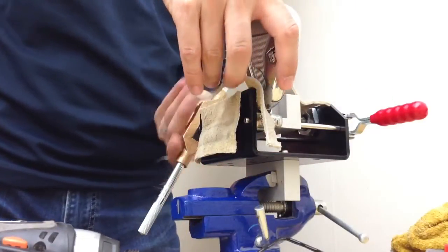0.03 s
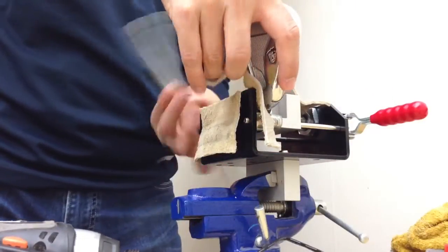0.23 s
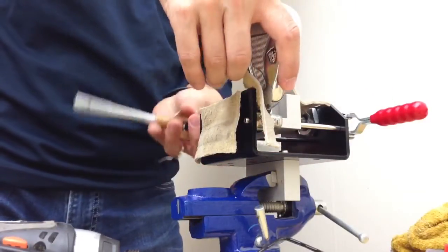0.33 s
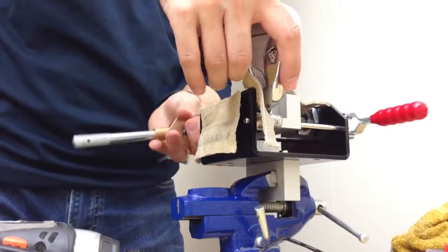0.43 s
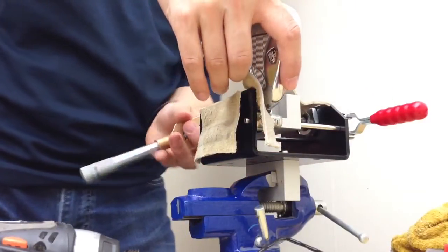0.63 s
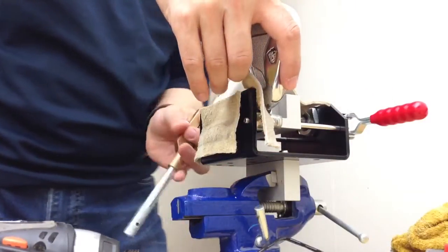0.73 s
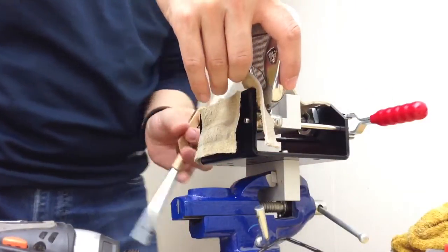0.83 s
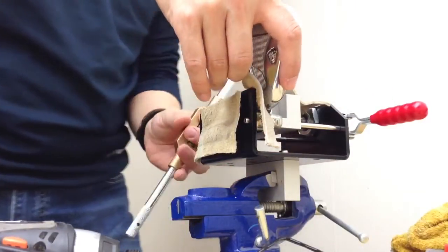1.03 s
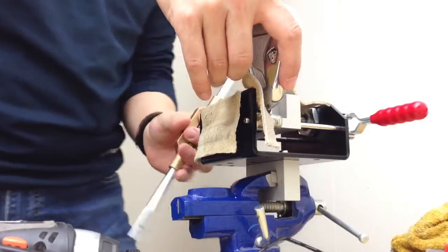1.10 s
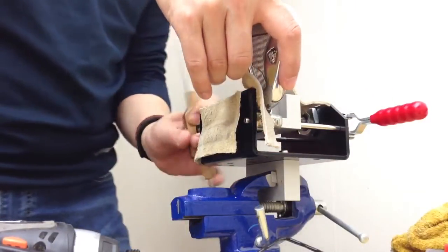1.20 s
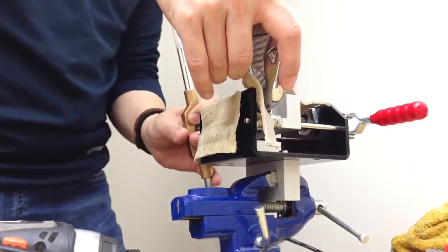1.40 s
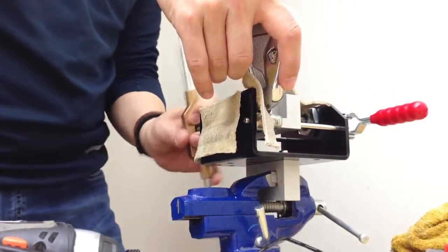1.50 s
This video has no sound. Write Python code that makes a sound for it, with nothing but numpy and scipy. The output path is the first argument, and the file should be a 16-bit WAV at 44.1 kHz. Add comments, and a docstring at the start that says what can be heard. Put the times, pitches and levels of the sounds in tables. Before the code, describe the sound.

A hand reamer scrapes inside a vise-held metal part in short, gritty, faintly groaning strokes. The first, at 0.2 seconds, carries piercing, very high squeaks, followed by ringing knocks of the loose handle until 0.4. A second stroke at 0.7 squeaks briefly and cracks; light knocks follow. A third at 1.2 crackles with breaking chips. A harsher rasp starts around 1.5, in a small, quiet workshop.

```python
"""Small workshop: a hand reamer is turned in short strokes in a metal part held in a vise.
The flutes scrape and shed chips, which shake the clamp; the dragging tool groans and whistles.
Now and then an edge sticks and squeals very high. The loose sliding handle knocks in its
holder and rings. A harsher rasp starts at the end."""
import sys
import numpy as np
from scipy import signal
from scipy.fft import rfft, irfft
from scipy.io import wavfile
from scipy.ndimage import uniform_filter1d

SR = 44100
rng = np.random.default_rng(int(sys.argv[2]) if len(sys.argv) > 2 else 0)


def persist_wave(psi):
    """Save psi, clipped to +-1, as 16-bit WAV."""
    counts = np.round(np.clip(psi, -1, 1) * 32767).astype(np.int16)
    wavfile.write(sys.argv[1], SR, np.atleast_2d(counts).T)


N = 68355
T = np.arange(N) / SR
DULL_CONTACT_HZ, SHARP_CONTACT_HZ = 1540, 3920


def from_db(db):
    """Decibels to gain."""
    return 10 ** (np.asarray(db) / 20)


def unit_rms(x):
    """Scale to unit power."""
    return x / np.sqrt(np.mean(x ** 2) + 1e-20)


def lowpass(x, hz):
    """Two-pole low-pass."""
    return signal.sosfilt(signal.butter(2, hz, fs=SR, output="sos"), x)


def drift(rate_hz):
    """Smooth random wobble, unit power."""
    return unit_rms(lowpass(rng.standard_normal(N), rate_hz))


def colour(x, spectrum):
    """Apply a (frequency [Hz], gain [dB]) curve; unit power."""
    hz, db = np.transpose(spectrum)
    bins_hz = np.maximum(np.fft.rfftfreq(2 * N, 1 / SR), 1)
    gain = from_db(np.interp(np.log(bins_hz), np.log(hz), db))
    return unit_rms(irfft(rfft(x, 2 * N) * gain)[:N])


def grains(per_s, spread_db):
    """Random clicks of uneven size."""
    sizes = from_db(spread_db * np.minimum(rng.exponential(1, N), 4))
    return sizes * rng.choice([-1, 1], N) * (rng.random(N) < per_s / SR)


def blows(times_s, levels_db, contact_hz):
    """One low-passed click per contact."""
    clicks = np.zeros(N)
    np.add.at(clicks, (times_s * SR).astype(int), from_db(levels_db))
    return lowpass(clicks + 1e-18, contact_hz)


def resonate(drive, modes):
    """Decaying modes in parallel, alternating in sign."""
    out = np.zeros(N)
    for k, (hz, db, t60_s) in enumerate(modes):
        radius = from_db(-60 / (t60_s * SR))
        feedback = [1, -2 * radius * np.cos(2 * np.pi * hz / SR), radius ** 2]
        out += (-1) ** k * from_db(db) * signal.lfilter([.5, 0, -.5], feedback, drive + 1e-18)
    return out


def envelope(time_s, hold_s, rise_s, decay_s):
    """Smooth rise ending at time_s, hold, exponential fall."""
    rise = np.clip((T - time_s) / rise_s + 1, 0, 1)
    fall = np.exp(-np.maximum(T - time_s - hold_s, 0) / decay_s)
    return np.sin(rise * np.pi / 2) ** 2 * fall


def bursts(times_s, levels_db, spectrum, decay_s, rise_s=0.0011):
    """Short bursts of coloured noise."""
    level = sum(from_db(db) * envelope(time_s + rise_s / 2, 0, rise_s, decay_s)
                for time_s, db in zip(times_s, levels_db))
    return level * colour(rng.standard_normal(N), spectrum)


# cutting-edge load: (time [s], level [dB])
EDGE_LOAD = [(0, -96), (.18, -70), (.225, -53.5), (.285, -45.5), (.33, -55.5), (.45, -65), (.52, -67),
             (.58, -75), (.63, -104), (.685, -82), (.735, -49), (.80, -55), (.86, -71), (.91, -58),
             (.95, -79), (.985, -80), (1.15, -86), (1.195, -49.5), (1.25, -46.5), (1.29, -44.5),
             (1.345, -47), (1.375, -56.5), (1.46, -74.5), (1.55, -77)]
# vise and part modes: (frequency [Hz], gain [dB], t60 [s])
VISE_MODES = [(75, -20.5, 0.1), (165.5, -6, 0.11), (248.6, -4, 0.11), (294.7, -5, 0.12), (337.3, -5, 0.16),
              (401, -4.5, 0.063), (468, -1.5, 0.087), (545, -3, 0.045)]
PART_MODES = [(624, -7, 0.042), (824, -5.5, 0.045), (941, -1.5, 0.046), (1049, -4, 0.017),
              (1388, -10.5, 0.053), (1630, -12.5, 0.033)]


def chatter():
    """Uneven slips of the loaded edges shake vise and part."""
    slips = lowpass(grains(per_s=600, spread_db=4), DULL_CONTACT_HZ)
    shake = resonate(slips, VISE_MODES) + from_db(-0.5) * resonate(slips, PART_MODES)
    shake /= np.sqrt(uniform_filter1d(shake ** 2, size=2205) + 1e-9)  # unit power over 50 ms
    load_db = np.interp(T, *np.transpose(EDGE_LOAD))
    return from_db(load_db) * shake


# reamer strokes: (time [s], hold [s], level [dB])
STROKES = [(0.227, 0.088, -52.5), (0.548, 0.033, -67.5), (0.719, 0.035, -54), (0.888, 0.013, -63),
           (1.199, 0.058, -52.5), (1.244, 0.13, -70)]
# flute friction: (frequency [Hz], gain [dB])
SCRAPE_SPECTRUM = [(60, -27), (300, -4), (700, 5.5), (1200, 6.5), (1750, -7), (2200, 3.5), (3600, -8.5),
                   (5500, -13.5), (6700, -7.5), (8200, -11), (12000, -12), (16000, -16.5)]


def scrape():
    """Flutes slide over the metal with a grainy, catching rasp."""
    level = sum(from_db(db) * envelope(time_s, hold_s, rise_s=0.038, decay_s=0.033)
                for time_s, hold_s, db in STROKES)
    catches = from_db(2 * drift(rate_hz=69.4))
    return level * catches * colour(grains(per_s=3500, spread_db=3.5), SCRAPE_SPECTRUM)


# harsh rasp: (frequency [Hz], gain [dB])
BITE_SPECTRUM = [(150, -23), (500, 4), (800, -1), (1600, -9.5), (2000, -0.5), (2300, 7), (3200, -7),
                 (4300, 1), (5200, -2.5), (6200, -8), (10000, -11.5), (15000, -31)]


def bite():
    """The edges dig in with a brighter, harsher rasp."""
    level = from_db(-40.5) * envelope(time_s=1.543, hold_s=1, rise_s=0.0078, decay_s=1)
    return level * colour(grains(per_s=3500, spread_db=3.5), BITE_SPECTRUM)


# chip breaks: (time [s], thud [dB], clink [dB], crack [dB])
CHIPS = [(.7412, -45, -46.5, -49.5), (.776, -44, -63, -36.5), (1.2476, -45, -40.5, -49),
         (1.2540, -49, -34.5, -57), (1.2795, -32.5, -39, -44), (1.2860, -38, -39.5, -56),
         (1.318, -41.5, -40, -48.5)]
# fracture noise: (frequency [Hz], gain [dB])
CRACK_SPECTRUM = [(300, -17), (1400, 5), (1800, -0.5), (2250, 3.5), (2850, -4), (3400, -12), (4300, -7.5),
                  (6000, -14.5), (15000, -31)]
# modes of the chip and of the part in padded jaws: (frequency [Hz], gain [dB], t60 [s])
SNAP_MODES = [(2075, -3.5, 0.029), (2277, -3, 0.027), (2810, -7.5, 0.042)]
THUD_MODES = [(402, 2, 0.018)]


def chips():
    """Each chip cracks off, rings the part and jolts the vise."""
    times_s, thud_db, clink_db, crack_db = np.transpose(CHIPS)
    crack = bursts(times_s, crack_db - 8, CRACK_SPECTRUM, decay_s=0.0057)
    snap = resonate(blows(times_s, crack_db - 0.5, SHARP_CONTACT_HZ), SNAP_MODES)
    jolt = blows(times_s, thud_db, DULL_CONTACT_HZ)
    thud = resonate(jolt, THUD_MODES) + from_db(-3) * resonate(jolt, VISE_MODES)
    clink = resonate(blows(times_s, clink_db, DULL_CONTACT_HZ), PART_MODES)
    return crack + snap + thud + clink


# sticking edge: (time [s], hold [s], pitch [Hz], level [dB])
SQUEALS = [(0.214, .002, 14900, -38.5), (0.2498, 0.0052, 14480, -13), (.261, 0.0025, 15050, -30),
           (.272, 0.0028, 15120, -18.5), (0.304, 0.0038, 15140, -21), (0.7145, 0.0013, 14580, -26.5),
           (.720, .001, 14480, -37)]


def squeals(wander_hz=110, flutter_hz=454):
    """Stick-slip drives a very high, unsteady tool mode for milliseconds."""
    out = np.zeros(N)
    for time_s, hold_s, hz, db in SQUEALS:
        pitch_hz = hz + wander_hz * drift(flutter_hz)
        level = from_db(db) * envelope(time_s, hold_s, rise_s=0.0035, decay_s=0.003)
        roughness = 1 + 0.16 * drift(flutter_hz)
        out += level * roughness * np.sin(2 * np.pi * np.cumsum(pitch_hz) / SR)
    return out


# handle impacts: (time [s], thump [dB], clack [dB], ring [dB], jangle [dB])
KNOCKS = [(.002, -54.5, -55.5, -65.5, -74), (.098, -63, -58.5, -79, -82), (.162, -54.5, -56, -66, -79),
          (.192, -64, -48.5, -67, -60), (0.196, -47.5, -37.5, -75, -57), (.290, -39, -47, -42.5, -41.5),
          (.301, -37.5, -35, -48, -47), (0.3893, -36.5, -33, -63, -50.5), (.401, -38, -41.5, -50, -49),
          (0.506, -54.5, -43, -80, -74), (.639, -54.5, -57.5, -67, -72), (.662, -57.5, -65, -83, -72),
          (.845, -48, -54, -62.5, -61), (1.015, -43.5, -50, -56.5, -56), (1.038, -58, -58.5, -68, -64),
          (1.382, -50, -53, -59.5, -68)]
# holder (thump, clack), clamp and bar (ring, jangle) modes: (frequency [Hz], gain [dB], t60 [s])
THUMP_MODES = [(543, -2, 0.021), (654.6, 0.5, 0.046), (757, -2, 0.016)]
CLACK_MODES = [(905, -9, 0.026), (1044.5, 2.5, 0.04), (1166, -3, 0.058), (1483, -9, 0.025),
               (1950, -21, 0.044)]
CLAMP_MODES = [(350, -9.5, 0.033), (467, 1, 0.098)]
RING_MODES = [(3147, 0, 0.16)]
JANGLE_MODES = [(2002, -5.5, 0.038), (3670, -4, 0.042), (4171, -7, 0.17), (4550, -2, 0.04),
                (6800, -11, 0.14)]
# contact noise: (frequency [Hz], gain [dB])
TICK_SPECTRUM = [(300, -8), (1900, 2), (2800, 2), (4300, 0), (6000, -21), (14000, -19)]


def handle():
    """The loose steel bar strikes its holder; returns the knock and the bar's wavering ring."""
    times_s, thump_db, clack_db, ring_db, jangle_db = np.transpose(KNOCKS)
    clamp_db = -36 + 2.8 * (thump_db - thump_db.max())  # only hard knocks reach the clamp
    thump = resonate(blows(times_s, thump_db, DULL_CONTACT_HZ), THUMP_MODES)
    clack = resonate(blows(times_s, clack_db, DULL_CONTACT_HZ), CLACK_MODES)
    clamp = resonate(blows(times_s, clamp_db, DULL_CONTACT_HZ), CLAMP_MODES)
    tick = bursts(times_s, jangle_db - 3, TICK_SPECTRUM, decay_s=0.0032)
    ring = resonate(blows(times_s, ring_db, SHARP_CONTACT_HZ), RING_MODES)
    jangle = resonate(blows(times_s, jangle_db, SHARP_CONTACT_HZ), JANGLE_MODES)
    waver = from_db(3 * drift(rate_hz=35.6))
    return thump + clack + clamp + tick, (ring + jangle) * waver


# clamp groans: (time [s], hold [s], centre pitch [Hz], level [dB])
GROANS = [(0.242, .045, 172, -48), (.34, 0.021, 245, -55.5), (.465, 0.022, 175, -63.5),
          (.575, .025, 175, -62.5), (.803, .018, 262, -50.5), (.83, .035, 78, -66),
          (0.924, .03, 172, -59.5), (1.205, .045, 166, -49.5), (1.295, .05, 295, -51)]


def groans(sag_per_s=1.2):
    """Slow stick-slip of the dragging tool: low clamp tones that sag in pitch."""
    out = np.zeros(N)
    for time_s, hold_s, hz, db in GROANS:
        sag = np.exp(-sag_per_s * (T - time_s - hold_s / 2))
        pitch_hz = hz * sag * (1 + 0.0395 * drift(rate_hz=59.3))
        phase = 2 * np.pi * np.cumsum(pitch_hz) / SR
        tone = np.sin(phase) + from_db(-14) * np.sin(2 * phase)
        level = from_db(db) * envelope(time_s, hold_s, rise_s=0.018, decay_s=0.0075)
        roughness = 1 + 0.25 * drift(rate_hz=44)
        out += level * roughness * tone
    return out


# rough whistles: (time [s], hold [s], pitch [Hz], level [dB])
WHISTLES = [(0.221, 0.055, 2070, -60), (0.223, 0.0091, 6500, -56), (0.252, 0.0057, 4830, -62),
            (.892, 0.012, 6600, -67), (1.211, 0.009, 6540, -62.5), (1.25, 0.0052, 5050, -59)]


def whistles(q=12):
    """Friction noise briefly catches in one narrow resonance."""
    out = np.zeros(N)
    for time_s, hold_s, hz, db in WHISTLES:
        band = signal.butter(2, [hz * (1 - .5 / q), hz * (1 + .5 / q)], "band", fs=SR, output="sos")
        level = from_db(db) * envelope(time_s, hold_s, rise_s=0.0035, decay_s=0.0042)
        out += level * unit_rms(signal.sosfilt(band, rng.standard_normal(N)))
    return out


def room(x, wet_db, t60_s, delay_s=0.0043):
    """Direct sound plus the workshop's diffuse tail."""
    tail = rng.standard_normal(N) * from_db(-60 * T / t60_s) * (T > delay_s)
    tail /= np.sqrt(np.sum(tail ** 2))
    return x + from_db(wet_db) * signal.fftconvolve(x, tail)[:N]


# background noise: (frequency [Hz], gain [dB])
FLOOR_SPECTRUM = [(25, -46), (55, -28), (78, 0.5), (105, -9.5), (170, 5), (500, 0), (1050, -1), (1600, -9),
                  (3000, -6.5), (6000, -9.5), (15000, -13)]


def noise_floor():
    """Faint, steady rumble and hiss."""
    return from_db(-65) * colour(rng.standard_normal(N), FLOOR_SPECTRUM)


def scene():
    """Tool and vise in the room over the noise floor; mono."""
    cutting = chatter() + scrape() + groans() + whistles() + bite() + chips()
    knock, bar_ring = handle()
    work = room(cutting + knock, wet_db=-9, t60_s=0.21)
    squeal = room(squeals(), wet_db=-11.5, t60_s=0.21)
    ring = room(bar_ring, wet_db=-9, t60_s=0.4)
    return (work + squeal + ring + noise_floor())[None]


def record(dry):
    """Steep low-pass at 15350 Hz."""
    return signal.sosfilt(signal.ellip(10, .2, 70, 15350, fs=SR, output="sos"), dry)


dry = scene()
out = record(dry)
persist_wave(out)
```